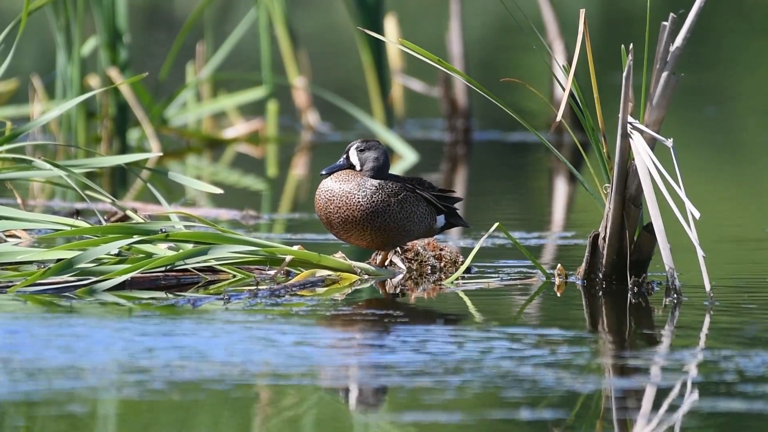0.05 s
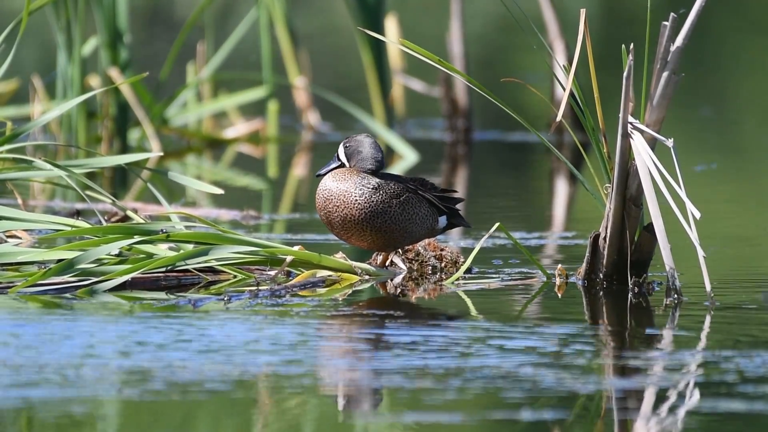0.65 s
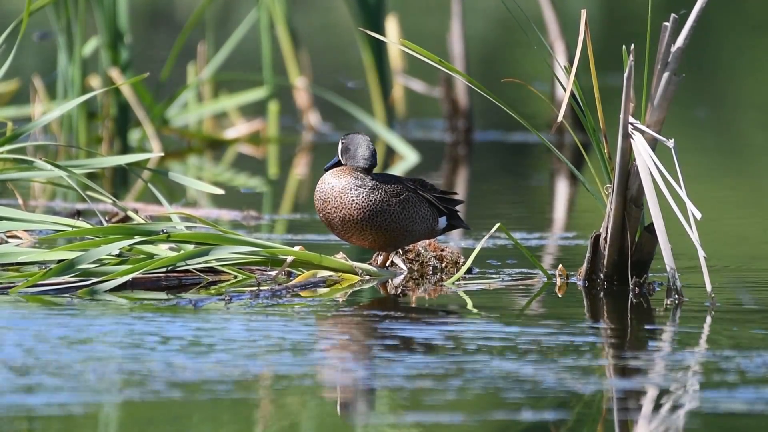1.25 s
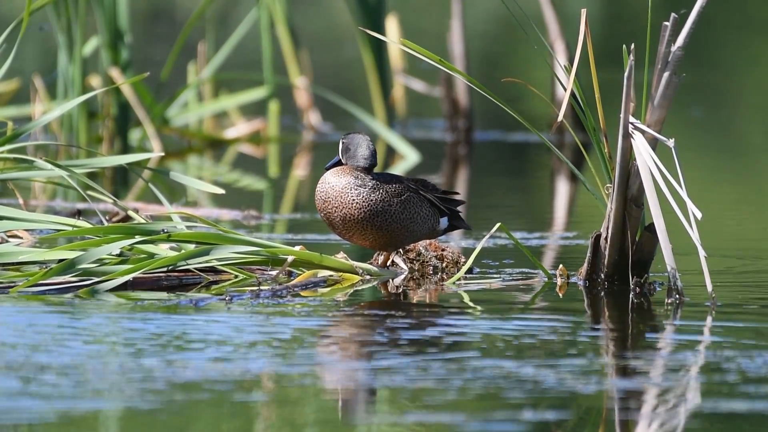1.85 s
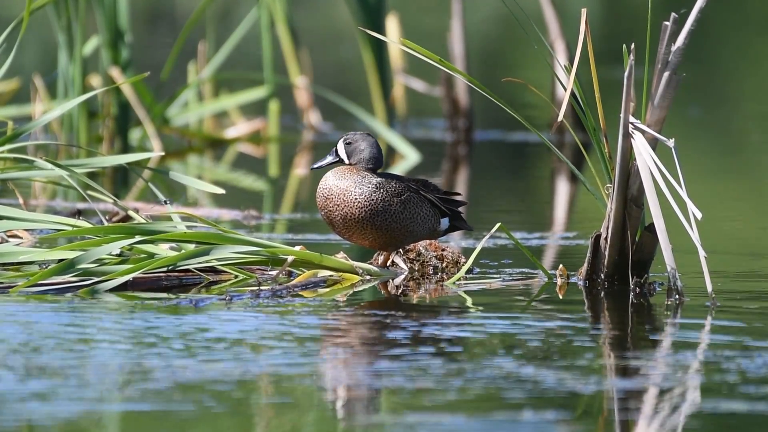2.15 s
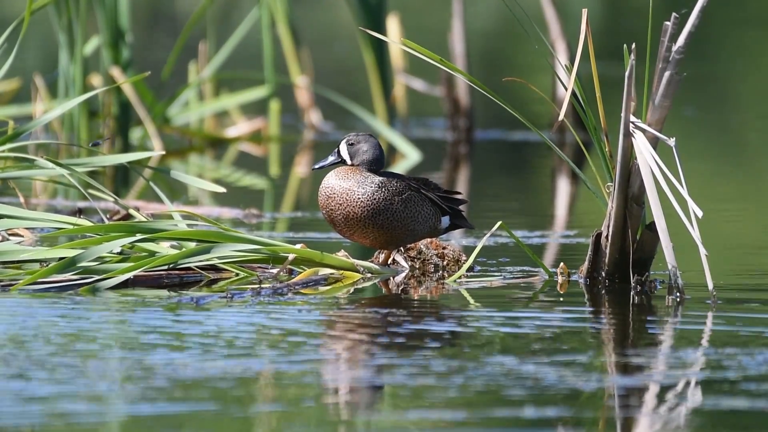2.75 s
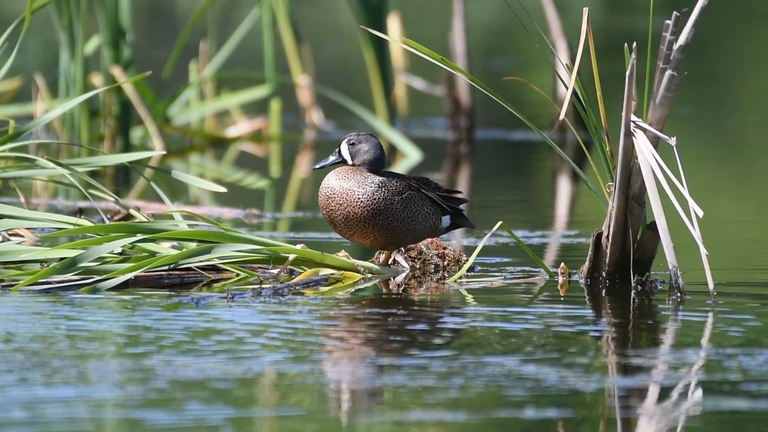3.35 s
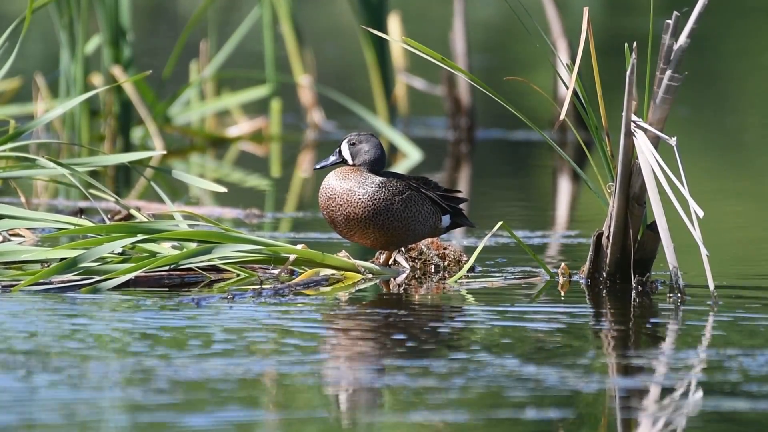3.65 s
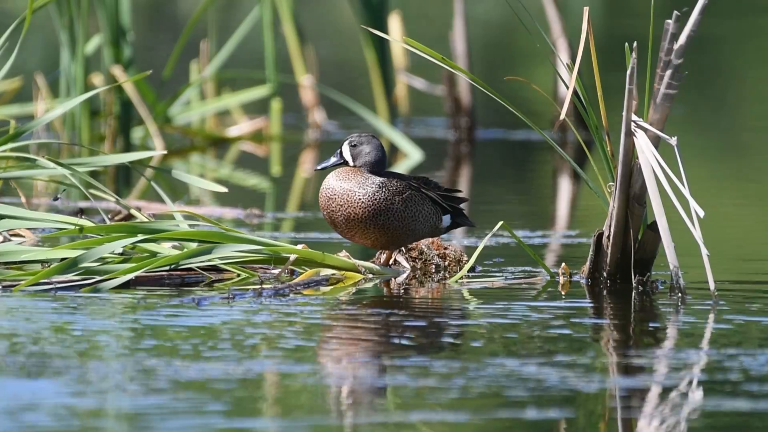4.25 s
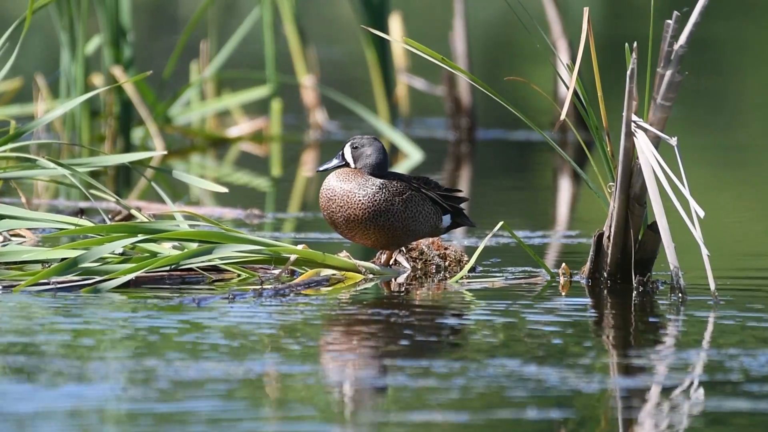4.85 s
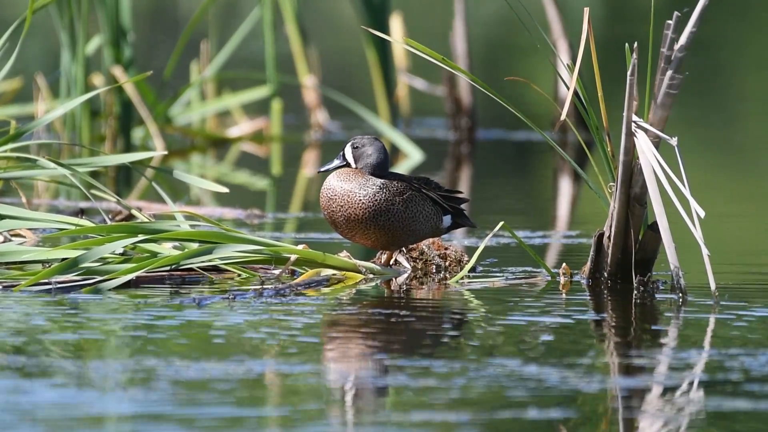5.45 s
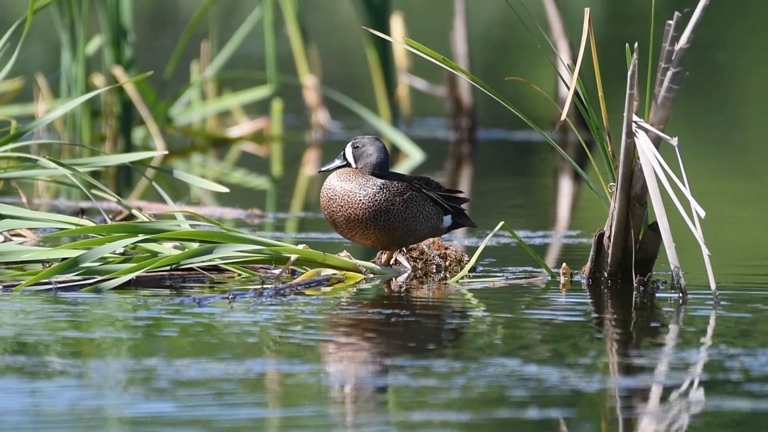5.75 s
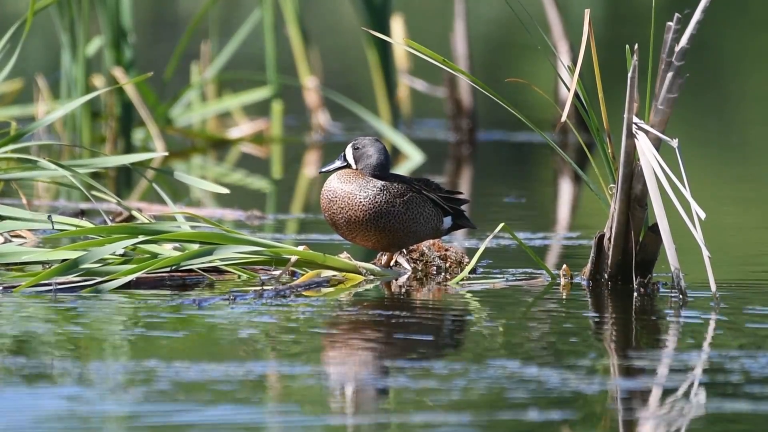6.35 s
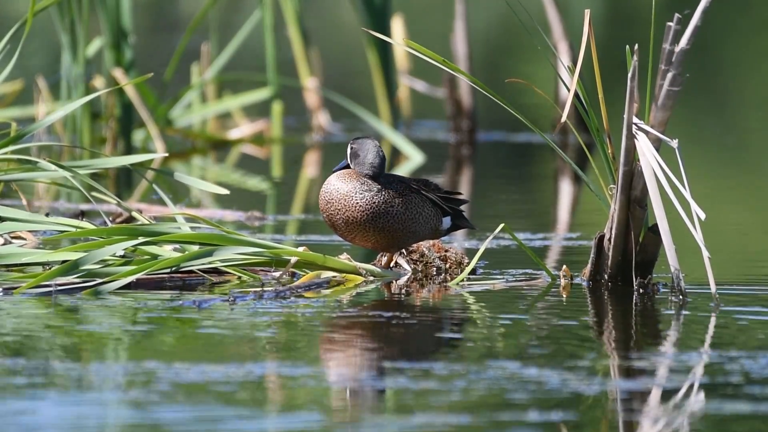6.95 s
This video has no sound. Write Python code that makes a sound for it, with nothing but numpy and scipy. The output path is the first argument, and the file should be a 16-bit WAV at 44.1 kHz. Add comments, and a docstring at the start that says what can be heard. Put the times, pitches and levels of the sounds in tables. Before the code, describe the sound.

Harsh, close blackbird calls pass right to left over a calm marsh, followed by distant buzzy trills, falling whistles and soft grunts.

```python
"""A calm marsh. A blackbird flies close past from right to left, feathers rustling, giving harsh chucks:
puffs of air through its throat, mirrored by the water. Farther off, other blackbirds sing buzzy trills and
falling whistles, a warbler repeats a high two-note phrase, a songbird slurs soft whistles, thin chips
sound and a water bird rattles and grunts, each a gliding syrinx tone. Reeds and banks scatter the birds'
sounds and a few faint dry ticks over a bed of soft air and a distant motor's hum."""
import sys
import numpy as np
from scipy import signal
from scipy.fft import rfft, irfft
from scipy.io import wavfile
from scipy.ndimage import uniform_filter1d

SR = 44100
rng = np.random.default_rng(int(sys.argv[2]) if len(sys.argv) > 2 else 0)


def store_wav(level_fs):
    """Save 16-bit WAV to argv[1]."""
    pcm = np.round(np.clip(np.atleast_2d(level_fs), -1, 1) * 32767)
    wavfile.write(sys.argv[1], SR, pcm.T.astype(np.int16))


N = 313101

# Throughout, a positive pan_db leans left and a positive lag_ms makes the right ear late.
# the flying bird's calls: start_s, length_s, level_db, throat1_hz, throat2_hz, throat3_hz, treble_db, pan_db
CHUCKS = [(1.708, .052, -17.5, 1430, 2230, 2850, -2.5, -1.2),
          (1.916, 0.045, -16, 1800, 2240, 2830, -5, -1.5),
          (2.155, 0.051, -16.5, 1700, 2390, 2830, 1.5, 2.5),
          (2.415, 0.053, -18.5, 1450, 2130, 2910, -1.5, 40),
          (2.731, 0.048, -21, 1330, 2020, 2980, -0.5, 18),
          (3.324, .054, -26.5, 1510, 2330, 2430, -3.5, 5.5), (3.93, .062, -35.5, 1380, 2270, 2980, -2, 5.5),
          (4.948, .06, -40.5, 1440, 2450, 2640, -4.5, 5)]
# tone colour of a chuck: frequency_hz, gain_db
CHUCK_EQ = [(250, -49), (600, -16.5), (850, -6.5), (1300, -7), (2200, 0), (3100, 0.5), (3600, -8.5),
            (5200, -5), (6500, -7), (8150, 6), (8900, -9.5), (10400, -15), (11500, -22), (15500, -35)]
# wing strokes: start_s, length_s, level_db
WING_STROKES = [(0.058, 0.065, -58.5), (0.755, .1, -63.5), (0.972, 0.055, -59.5), (1.115, 0.041, -59),
                (1.466, 0.16, -58.5), (1.648, 0.064, -43.5), (1.749, 0.06, -53), (1.797, 0.03, -42),
                (1.855, 0.05, -60), (1.968, .12, -48.5), (2.095, 0.059, -54.5)]
# faint dry ticks and clicks scattered over the marsh: start_s, level_db
TICKS = [(.211, -49), (0.448, -44), (0.831, -54), (1.019, -46), (1.499, -44), (1.76, -29), (1.852, -33),
         (1.881, -41), (2.052, -46), (6.713, -50), (7.079, -42.5)]
# tone colour of the wing strokes and of the ticks: frequency_hz, gain_db
RUSTLE_EQ = [(80, -10), (190, 0.5), (450, -5.5), (1500, -4), (4500, -10), (6200, -3.5), (8000, -4.5),
             (9400, 2.5), (11500, -14), (15500, -15.5)]
# falling whistles: start_s, length_s, drop_hz (before the ceiling), settled_hz, level_db, swell_s, swell_db
WHISTLES = [(4.681, 0.14, 1700, 4523, -38.5, 0.012, 15), (5.024, 0.12, 1900, 4505, -30.5, 0.021, 17),
            (5.328, 0.1, 1700, 4460, -27.5, 0.052, 11), (6.367, 0.23, 119, 4359, -30, 0.043, 17)]
# the warbler's rising note: time_s, pitch_hz, gain_db
UP_NOTE = [(0, 6900, -19), (.014, 7260, 0.5), (.024, 7550, -1), (.034, 7850, -10.5), (.041, 8100, -16)]
# its falling note: time_s, pitch_hz, gain_db
DOWN_NOTE = [(0, 6470, -10), (.005, 6210, 6), (0.012, 5970, 1), (0.0171, 5650, 10), (.02, 5150, -5),
             (0.023, 4860, -15)]
# the hiss on its notes: frequency_hz, gain_db
WARBLER_HISS_EQ = [(2500, -22), (4500, 4), (8000, -12), (10000, -19), (15000, -24)]
# opening notes of the blackbird songs: start_s, length_s, pitch_hz, level_db, swing_hz
BUZZES = [(2.779, .12, 1915, -49, 10), (3.018, 0.05, 1980, -54.5, 160), (3.099, 0.035, 2440, -51.5, 220),
          (3.134, 0.063, 3300, -46, 150), (3.194, 0.053, 2300, -47, 270), (3.242, .033, 3700, -46.5, 550),
          (5.202, 0.11, 1420, -62, 21), (5.32, 0.076, 3050, -40, 320), (5.401, 0.07, 2327, -35.5, 100)]
# the hiss on their trills: frequency_hz, gain_db
TRILL_HISS_EQ = [(1500, -37), (2800, 1), (4200, 0), (5200, 7.5), (7500, -9), (12000, -20)]
# the songbird's phrase, sung twice: start_s, level_db, lead_in_hz, pan_db, lag_ms
SLUR_PHRASES = [(1.413, -35, 2020, 5.5, 0.17), (5.71, -33.5, 2230, -7.5, 0.088)]
# its arched notes: after_s, rise_s, hold_s, fall_s, foot_hz, top_hz, gain_db, glide_db (added off the top)
ARCHED_NOTES = [(0.286, .034, 0.027, .062, 1450, 2680, 1.5, -10.5),
                (0.38, 0.0052, 0.0047, .075, 2027, 3520, -14, -0.5),
                (.553, .05, 0.014, 0.069, 1900, 3520, -12, -5.5),
                (0.562, 0.0274, 0.0118, .032, 1510, 1853, -12.5, -2)]
# the water bird's grunts: start_s, length_s, level_db
GRUNTS = [(4.443, .0067, -39.5), (4.454, 0.0079, -46), (4.465, 0.021, -40.5), (4.483, .0065, -38),
          (4.491, 0.01, -37), (4.502, 0.047, -36.5), (4.531, 0.042, -43.5), (6.171, 0.0066, -42.5),
          (6.186, 0.011, -39.5), (6.205, 0.0084, -35.5), (6.224, 0.01, -36), (6.272, 0.024, -40.5),
          (6.303, .0085, -39.5), (6.34, 0.011, -44.5)]
# its two calls hold a pitch, then sag: sag_start_s, pitch_hz, sag_hz_per_s
GRUNT_PITCHES = [(4.498, 717.4, 1530), (6.225, 751, 1330)]
# a grunt's nasal harmonics, lowest first: gain_db
GRUNT_HARMONICS = [-4.5, -5.5, -9, -8, -16, -18]
# its soft rattles: start_s, length_s, pulse_rate_hz, opening_level_db, swell_db
RATTLES = [(0, 0.35, 77, -46, -4), (4.278, 0.18, 79, -51.5, 9.5), (5.918, .245, 65, -50.5, 8)]
# thin distant chips: start_s, length_s, pitch_hz, level_db, rasp_hz
CHIPS = [(0.098, 0.041, 3230, -59, 300), (1.012, 0.015, 3880, -57.5, 400), (1.293, .055, 3330, -62, 300),
         (2.491, 0.03, 5800, -49, 300), (2.536, 0.056, 6110, -47.5, 130), (2.626, 0.035, 5650, -46, 250),
         (2.678, .048, 6200, -45, 130), (2.828, 0.036, 5200, -48.5, 200), (2.894, .025, 4800, -53, 100),
         (2.939, .041, 5590, -42, 397), (2.979, 0.032, 6400, -40.5, 200), (3.148, 0.039, 5490, -45.5, 350),
         (3.465, 0.022, 5850, -44, 654), (3.556, 0.035, 5790, -49, 553), (3.672, 0.035, 5460, -54, 350),
         (4.261, .021, 4580, -58.5, 100), (4.399, 0.02, 4530, -60, 100), (6.542, 0.027, 8300, -56.5, 60),
         (6.783, .045, 8080, -57, 90), (6.949, 0.033, 8300, -58, 60), (6.996, 0.022, 5690, -52.5, 61)]
# tone colour of the open air: frequency_hz, gain_db
AIR_EQ = [(15, -45.5), (25, -8), (110, -5), (140, -8), (240, -11), (349, -15), (552, -14), (782, -16),
          (919, -11.5), (2120, -23.5), (2700, -20.5), (5730, -24.5), (6920, -28), (8130, -24.5),
          (15500, -32.5)]
# how alike the air is in both ears: frequency_hz, correlation
AIR_CORRELATION = [(40, 1), (120, 0.4), (400, 0.47), (1000, 0.1), (2500, 0), (12000, 0)]
# slow swells of the distant motor: time_s, level_db
MOTOR_SWELLS = [(0.0, -64.5), (1.34, -58), (2.94, -69), (5.71, -57.5), (7.1, -71)]

NEAREST_S, CROSSING_TAKES_S = 2.15, .59   # the fly-by: its closest moment, and the pace of its sweep


def chucks(pulse_hz=272, throat_db=6, throat_width_hz=320, mirror_gain=.32,
           direct_db=-5, diffuse_db=-10, far_wet_db=10, crossing_s=1.951, near_for_s=.46, recede_s=2.1):
    """Each chuck is a quick uneven run of air puffs through three throat resonances, mirrored by water."""
    out, send = np.zeros((2, 2, N))
    for s, length, db, *formants_hz, treble_db, pan_db in CHUCKS:
        t = seconds(length)
        far = np.clip((s - NEAREST_S) / recede_s, 0, 1)
        puff_phase = phase_of(pulse_hz * from_db(1.1 * drift(t, 200))) / (2 * np.pi) % 1
        puffs = rng.standard_normal((2, len(t))) * np.exp(-1.3 * puff_phase)
        ringing = sum(resonance(puffs, hz, throat_width_hz) for hz in formants_hz)
        call = eq(puffs + from_db(throat_db) * ringing, CHUCK_EQ)
        call = eq(call, [(750, -13 * far), (1400, 0), (3500, .0052), (8000, treble_db)])   # thins far off
        # the water's reflection comes later while the bird is near: a shifting comb of notches
        mirror_ms = .55 + .6 * np.exp(-((s - NEAREST_S) / near_for_s) ** 2)
        call = call + mirror_gain * np.roll(call, round(mirror_ms * SR / 1000), axis=1)
        direct, scattered = from_db(db + direct_db) * unit_rms(compress(call) * arch(t, power=1.44))
        lag_ms = .22 * np.tanh((s - crossing_s) / CROSSING_TAKES_S)
        place(out, s, direct, pan_db, lag_ms)
        place(out, s + .003, from_db(diffuse_db) * scattered, lag_ms=-lag_ms - .12)
        place(send, s, from_db(far_wet_db * far) * scattered)   # distant calls are wetter
    echoes = reeds(send, near_db=-11, near_t60=.1, far_db=-27.5, far_t60=.93) - send
    return out + echoes


def wings_and_ticks(flutter_db=3, approach_pan_db=-6.5, tick_decay_s=.0028):
    """Feathers rub in soft grainy strokes. Faint dry ticks and clicks are scattered over the marsh."""
    out = np.zeros((2, N))
    for s, length, db in WING_STROKES:
        t = seconds(length)
        pan_db = approach_pan_db * np.tanh((NEAREST_S - s) / CROSSING_TAKES_S)
        grains = rng.standard_normal(len(t)) * from_db(flutter_db * drift(t, 401))
        rub = unit_rms(eq(grains, RUSTLE_EQ))
        place(out, s, from_db(db) * arch(t, power=.58) * rub, pan_db)
    for s, db in TICKS:
        t = seconds(.016)
        place(out, s, from_db(db) * np.exp(-t / tick_decay_s) * noise(t, RUSTLE_EQ))
    return reeds(out, near_db=-1.5, near_t60=.042, far_db=-1.5, far_t60=1.0)


def whistles(drop_s=.013, ceiling_hz=5530, sag_hz=130, rasp_hz=560, hoarse_scale_hz=350, fade_db=21):
    """A blackbird's hoarse drop settles onto a pure, slowly sinking tone that swells and fades."""
    out = np.zeros((2, N))
    for s, length, drop_hz, settled_hz, db, swell_s, swell_db in WHISTLES:
        t = seconds(length)
        above_hz = drop_hz * np.exp(-(t / drop_s) ** 2)
        hoarseness = np.clip(above_hz / hoarse_scale_hz - .5, 0, 1)
        hz = np.minimum(settled_hz + above_hz - sag_hz * np.sqrt(t / length), ceiling_hz)
        hz = hz + rasp_hz * hoarseness * np.tanh(drift(t, 1310)) + 7 * drift(t, 101)
        swell_left = np.clip(1 - t / swell_s, 0, 1)
        fade = np.clip((t - swell_s) / (length - swell_s), 0, 1)
        envelope = from_db(db - swell_db * swell_left ** 1.55 - fade_db * fade ** 1.47)
        place(out, s, envelope * tone(hz, [0, -46, -36]), pan_db=-5.5, lag_ms=-.065)
    return reeds(out, near_db=-11, near_t60=.16, far_db=-16, far_t60=.95)


def warbler(start_s=5.502, phrase_s=.1667, down_after_s=.064, phrases=5,
            up_db=-33.5, down_db=-34, rasp_hz=180, hiss_db=-22):
    """A rising and a falling note, hoarse, repeated at an even pace."""
    out = np.zeros((2, N))
    for k in range(phrases):
        last = k == phrases - 1   # the last phrase is softer and holds back its second note
        up_s = start_s + k * phrase_s
        down_s = up_s + down_after_s + .009 * last
        notes = [(up_s, up_db, UP_NOTE, -.04), (down_s, down_db, DOWN_NOTE, -.06)]
        for s, level_db, shape, lag_ms in notes:
            t, hz, db = contours(shape)
            hz = hz + rng.normal(0, 43) + rasp_hz * drift(t, 1117)
            note = tone(hz, [0, -27]) * rasp(t, depth_db=3.5)
            hiss = from_db(hiss_db) * noise(t, WARBLER_HISS_EQ)
            place(out, s, from_db(level_db + db - 1.5 * last) * (note + hiss), pan_db=-.5, lag_ms=lag_ms)
    return reeds(out, near_db=-7, near_t60=.14, far_db=-14, far_t60=.8)


def blackbird_songs(left_trill_s=3.275, right_trill_s=5.47, left_pan_db=10, right_pan_db=-3):
    """Two males, one on each side: a few buzzing, climbing notes, then a long trill."""
    out = np.zeros((2, N))
    for s, length, pitch_hz, db, swing_hz in BUZZES:
        t = seconds(length)
        buzz_hz, pan_db = (175, left_pan_db) if s < left_trill_s else (255, right_pan_db)
        buzz = wobble(t, buzz_hz, jitter_db=.082, jitter_hz=92)
        climb = 1.34 * (t / length - .5)
        hz = pitch_hz + swing_hz * (climb + buzz + .41 * drift(t, 1027))
        note = tone(hz, [0, -26]) * unit_rms(from_db(2.1 * buzz))
        place(out, s, from_db(db) * arch(t, power=.78) * note, pan_db, lag_ms=-.085)
    slow = trill(length=.49, level_db=-46, fade_db=17, rate_hz=33.5, centre_hz=3060, step_hz=283,
                 buzz_hz=187.5, swing_hz=110, throb_db=1.5, overtone_db=-20)
    fast = trill(length=.51, level_db=-44.7, fade_db=3.5, rate_hz=52, centre_hz=3067, step_hz=325,
                 buzz_hz=272.5, swing_hz=151, throb_db=3, overtone_db=-22)
    place(out, left_trill_s, slow, left_pan_db, lag_ms=-.12)
    place(out, right_trill_s, fast, right_pan_db, lag_ms=-.06)
    return reeds(out, near_db=-8, near_t60=.11, far_db=-13, far_t60=.6)


def trill(length, level_db, fade_db, rate_hz, centre_hz, step_hz, buzz_hz, swing_hz, throb_db, overtone_db,
          attack_s=.018, swell_db=9, hiss_db=-9.5):
    """The voice flips between a low and a high buzzing note, fading late; its rasp spills a little hiss."""
    t = seconds(length)
    db = level_db - swell_db * np.clip(1 - t / attack_s, 0, 1) - fade_db * (t / length) ** 3
    flip = np.tanh(3 * wobble(t, rate_hz, jitter_db=.12, jitter_hz=20))
    buzz = wobble(t, buzz_hz, jitter_db=1.07, jitter_hz=150)
    hz = centre_hz - step_hz * flip + swing_hz * buzz + 150 * drift(t, 1200)
    hiss = from_db(hiss_db) * noise(t, TRILL_HISS_EQ)
    voice = tone(hz, [0, overtone_db, -34]) * rasp(t, depth_db=2.5)
    throb = unit_rms(from_db(throb_db * flip + 2.8 * buzz))
    return from_db(db) * throb * (voice + hiss)


def songbird(climb_s=.1, peak_s=.19, end_s=.222, peak_hz=2770, end_hz=1900,
             lead_db=-10, swell_db=15, foot_db=-8):
    """A lead-in holds, climbs and drops; then arched notes overlap, from both sides of the syrinx."""
    out = np.zeros((2, N))
    for s, song_db, lead_hz, pan_db, lag_ms in SLUR_PHRASES:
        t = seconds(end_s)
        hz = np.interp(t, [climb_s, peak_s, end_s], [lead_hz, peak_hz, end_hz])
        off_peak = np.interp(t, [0, peak_s, end_s], [1, 0, 1]) ** .92
        place(out, s, soft_whistle(hz, song_db + lead_db - swell_db * off_peak), pan_db, lag_ms)
        for after_s, rise_s, hold_s, fall_s, foot_hz, top_hz, db, glide_db in ARCHED_NOTES:
            t = seconds(rise_s + hold_s + fall_s)
            below_top = np.interp(t, np.cumsum([0, rise_s, hold_s, fall_s]), [1, 0, 0, 1])
            hz = top_hz * (foot_hz / top_hz) ** below_top
            level_db = song_db + db + foot_db * below_top + glide_db * np.tanh(8 * below_top)
            place(out, s + after_s, soft_whistle(hz, level_db), pan_db, lag_ms)
    return reeds(out, near_db=-10.5, near_t60=.12, far_db=-19, far_t60=.8)


def soft_whistle(hz, db, steady_db=-33, waver_hz=60, flutter_db=2.5):
    """A gliding whistle that breaks up a little; only the loudest tones hold steady."""
    t = np.arange(len(hz)) / SR
    unsteady = np.clip((steady_db - db) / 8, 0, 1)
    envelope = from_db(db + flutter_db * unsteady * drift(t, 179.6))
    return envelope * tone(hz + waver_hz * unsteady * drift(t, 595), [0, -24, -26])


def water_bird(pulse_s=.0053, rattle_hz=715, rattle_slowing=.14, hoarse_db=-15):
    """A dry, slowing rattle of tiny voiced pulses swells into nasal, falling grunts."""
    out = np.zeros((2, N))
    for s, length, db in GRUNTS:
        t = seconds(length)
        sag_s, pitch_hz, sag_hz_per_s = min(GRUNT_PITCHES, key=lambda call: abs(call[0] - s))
        hz = pitch_hz - sag_hz_per_s * np.maximum(s + t - sag_s, 0) + 11 * drift(t, 510)
        breath = unit_rms(resonance(rng.standard_normal(len(t)), hz=810, width_hz=640))
        grunt = tone(hz, GRUNT_HARMONICS) + from_db(hoarse_db) * breath
        place(out, s, from_db(db) * arch(t, power=.95) * grunt, pan_db=3.5, lag_ms=.13)
    for s, length, rate_hz, db, swell_db in RATTLES:
        t, pulse_t = seconds(length), seconds(pulse_s)
        pulse_count = phase_of(rate_hz * (1 - rattle_slowing * t / length)) // (2 * np.pi)
        for after_s in t[np.diff(pulse_count, prepend=-1) > 0]:
            pulse = tone(rattle_hz + 135 * drift(pulse_t, 430), [-6.5, -17, -15, -13.5])
            gain = from_db(db + swell_db * after_s / length + rng.normal(0, 1.9))
            place(out, s + after_s, gain * arch(pulse_t, power=3.1) * pulse, pan_db=3, lag_ms=.16)
    return reeds(out, near_db=-10.5, near_t60=.087, far_db=-15.5, far_t60=1.0)


def chips(fall_hz_per_s=9700):
    """Thin, hoarse, falling notes from deep in the reeds."""
    out = np.zeros((2, N))
    for s, length, pitch_hz, db, rasp_hz in CHIPS:
        t = seconds(length)
        hz = pitch_hz - fall_hz_per_s * (t - length / 2) + rasp_hz * drift(t, 1510)
        note = tone(hz, [0]) * rasp(t, depth_db=4.5)
        place(out, s, from_db(db) * arch(t, power=.67) * note, pan_db=-7, lag_ms=-.051)
    return reeds(out, near_db=-6, near_t60=.13, far_db=-9, far_t60=.6)


def reeds(x, near_db, near_t60, far_db, far_t60, build_s=.0054):
    """Stems scatter a dense short echo; the far banks return a long one. Decay times are in seconds."""
    t = seconds(.99)
    near, far = rng.standard_normal((2, 2, len(t))) * (1 - np.exp(-t / build_s))
    stems = from_db(near_db) * unit_rms(near * from_db(-60 * t / near_t60))
    banks = from_db(far_db) * unit_rms(far * from_db(-60 * t / far_t60))
    return x + signal.fftconvolve(x, (stems + banks) / np.sqrt(len(t)), axes=1)[:, :N]


def open_air(level_db=-53.5):
    """A faint wash of air, wide in the treble and alike in both ears only in the bass."""
    alike = np.clip(curve_per_bin(AIR_CORRELATION, N), -1, 1)
    mid, side = rfft(rng.standard_normal((2, N)))
    spectrum = np.sqrt(1 + alike) * mid + np.sqrt(1 - alike) * side * [[1], [-1]]
    return from_db(level_db) * unit_rms(eq(irfft(spectrum, N), AIR_EQ))


def distant_motor(pitch_hz=116.5):
    """A far motor's wavering hum swells and sinks."""
    t = np.arange(N) / SR
    hum = tone(pitch_hz + 1.7 * drift(t, 8.3), [0, -15])
    return hum * from_db(np.interp(t, *np.transpose(MOTOR_SWELLS)) + 1.32 * drift(t, 9.9))


def background(low_cut_hz=38):
    """The bed of air and motor, rumble rolled off, leaning slightly right."""
    low_cut = signal.butter(2, low_cut_hz, "high", fs=SR, output="sos")
    return signal.sosfilt(low_cut, open_air() + distant_motor()) * from_db([[-.7], [.7]])


def from_db(db):
    """Decibels to gain."""
    return 10 ** (np.asarray(db) / 20)


def unit_rms(x):
    """Scale to unit power."""
    return x / np.sqrt(np.mean(x ** 2) + 1e-20)


def seconds(length):
    """A time axis."""
    return np.arange(max(int(length * SR), 8)) / SR


def contours(rows):
    """Join breakpoints by straight lines: a time axis, then a curve for each further column."""
    s, *columns = np.transpose(rows)
    t = seconds(s[-1] - s[0])
    return [t] + [np.interp(t + s[0], s, column) for column in columns]


def curve_per_bin(points, size):
    """Read a curve at every frequency of a signal's spectrum."""
    hz, value = np.transpose(points)
    return np.interp(np.log(np.fft.rfftfreq(size, 1 / SR) + 1), np.log(hz), value)


def eq(x, points):
    """Colour x with a smooth EQ curve."""
    return irfft(rfft(x) * from_db(curve_per_bin(points, x.shape[-1])), x.shape[-1])


def noise(t, points):
    """Noise coloured by an EQ curve, unit power."""
    return unit_rms(eq(rng.standard_normal(len(t)), points))


def resonance(x, hz, width_hz):
    """One resonance of gain 1."""
    r = np.exp(-np.pi * width_hz / SR)
    feedback = [1, -2 * r * np.cos(2 * np.pi * hz / SR), r * r]
    return signal.lfilter(np.array([1, 0, -1]) * (1 - r * r) / 2, feedback, x)


def drift(t, rate_hz):
    """A random wander with a spread of about 1."""
    return np.interp(t * rate_hz, np.arange(8192), rng.standard_normal(8192))


def phase_of(hz):
    """Phase of a moving frequency, in radians."""
    return 2 * np.pi * np.cumsum(hz) / SR


def wobble(t, rate_hz, jitter_db, jitter_hz):
    """A sine modulator with a slightly uneven rate."""
    return np.sin(phase_of(rate_hz * from_db(jitter_db * drift(t, jitter_hz))))


def arch(t, power):
    """A swell that starts and ends at zero."""
    return np.abs(np.sin(np.pi * t / t[-1])) ** power


def tone(hz, harmonics_db):
    """A gliding tone built from its harmonics, unit power."""
    phase = phase_of(hz)
    return unit_rms(sum(from_db(db) * np.sin(k * phase) for k, db in enumerate(harmonics_db, 1)))


def rasp(t, depth_db):
    """Fast uneven flutter in a voice's strength, unit power."""
    return unit_rms(from_db(depth_db * drift(t, 800)))


def compress(x, window_s=.00304):
    """Hold a sound's strength steady from moment to moment."""
    return x / np.sqrt(uniform_filter1d(x ** 2, int(window_s * SR)) + 1e-12)


def place(out, s, x, pan_db=0, lag_ms=0):
    """Drop a sound into the stereo mix, with a level and a time difference between the ears."""
    gains = unit_rms(from_db([pan_db / 2, -pan_db / 2]))
    delay = np.exp(-2j * np.pi * np.fft.rfftfreq(2 * len(x), 1 / SR) * lag_ms / 1000)
    right = irfft(rfft(x, 2 * len(x)) * delay)[:len(x)]
    at = np.arange(len(x)) + int(s * SR)
    inside = (at >= 0) & (at < N)
    out[:, at[inside]] += (gains[:, None] * [x, right])[:, inside]


def scene():
    """All the birds over the quiet marsh."""
    foreground = chucks() + wings_and_ticks()
    chorus = whistles() + warbler() + chips() + blackbird_songs() + songbird() + water_bird()
    return foreground + chorus + background()


def record(dry, cutoff_hz=15850):
    """A steep high cut on the whole mix."""
    return signal.sosfilt(signal.ellip(12, .1, 80, cutoff_hz, fs=SR, output="sos"), dry)


dry = scene()
out = record(dry)
store_wav(out)
```